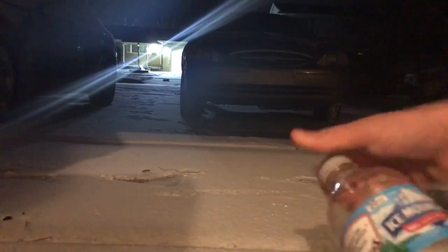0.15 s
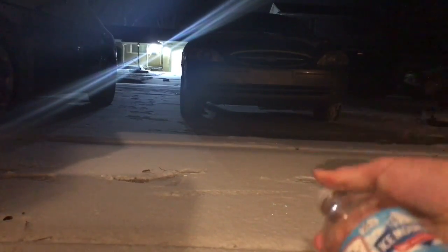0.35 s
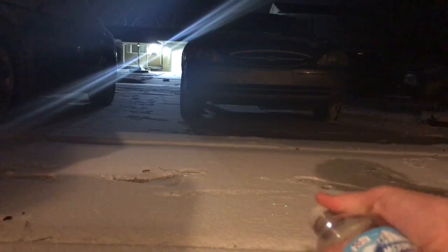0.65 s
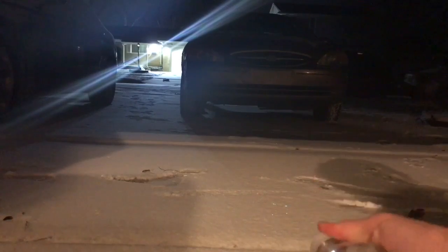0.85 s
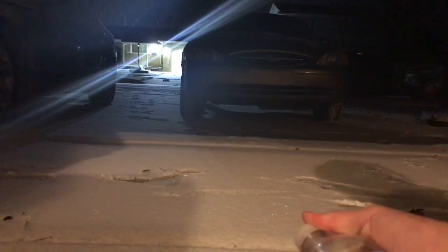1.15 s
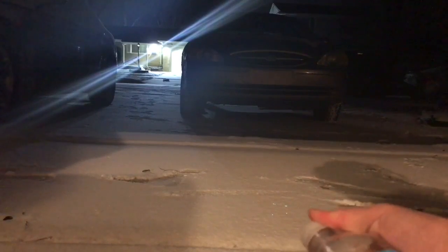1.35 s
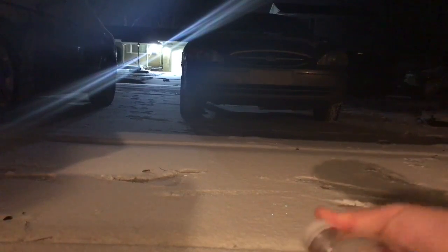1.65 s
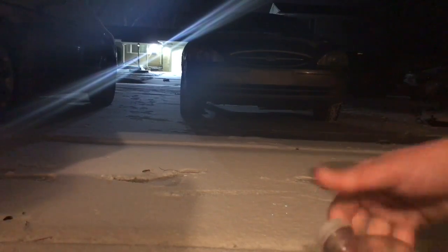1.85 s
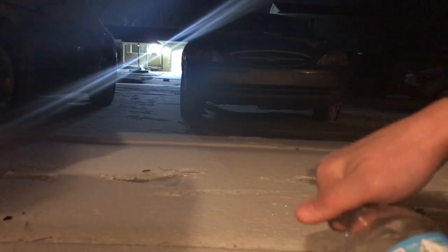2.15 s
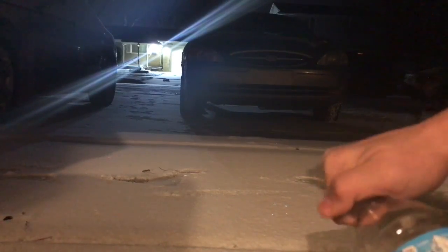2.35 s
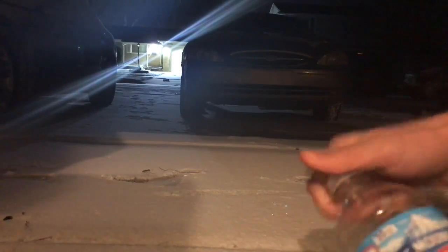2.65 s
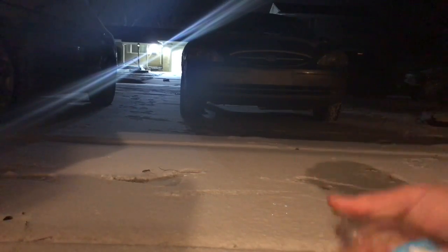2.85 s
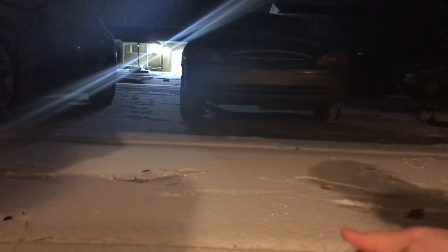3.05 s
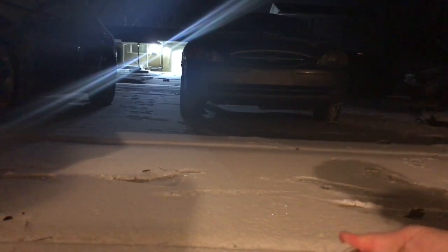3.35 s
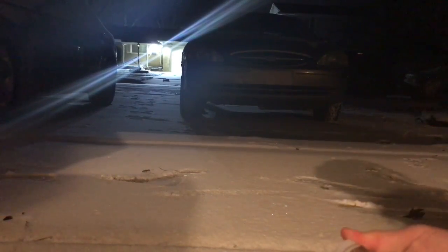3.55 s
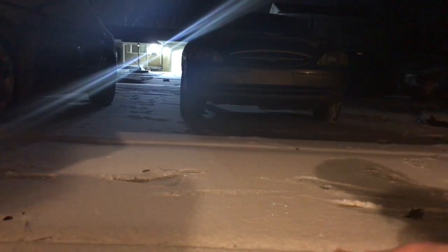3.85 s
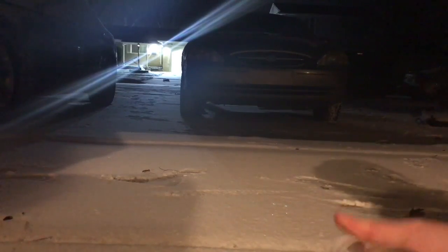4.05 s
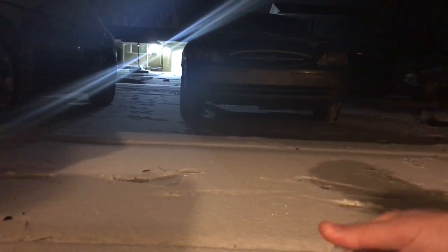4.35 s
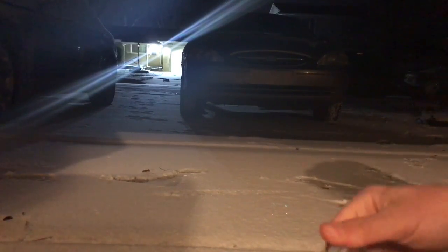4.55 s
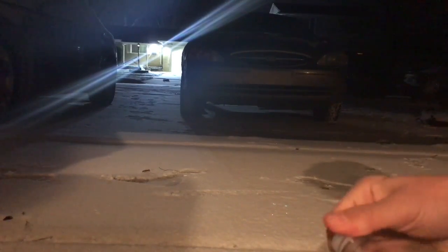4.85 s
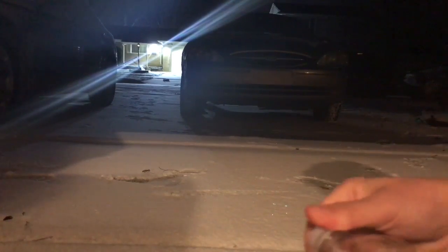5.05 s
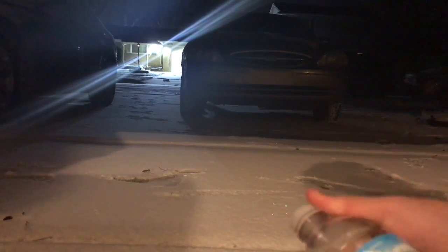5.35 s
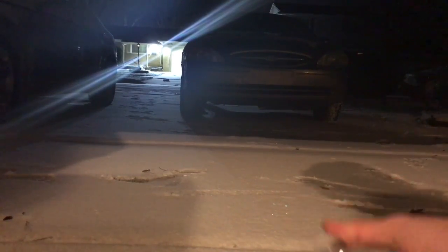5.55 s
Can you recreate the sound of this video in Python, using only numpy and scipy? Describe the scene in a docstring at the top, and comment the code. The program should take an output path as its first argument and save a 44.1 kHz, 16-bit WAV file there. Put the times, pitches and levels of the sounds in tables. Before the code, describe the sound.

Close by, fingers twist the cap of a fizzy plastic bottle, with quick thin snaps and a dull knock. A strong, bright hiss bursts out and fades over more than a second. After faint froth, small rubs and clicks, a weaker hiss swells and stops around a sharp crackling snap. Quiet handling follows. Outdoors over concrete, nearly dry, with a low distant town rumble and slight microphone hiss.

```python
"""Easing the cap of a fizzy drink bottle

A hand twice eases the cap of a pressurised plastic bottle, low over a driveway at night.
Gas jets through the thread as shaped noise: a long hiss and a shorter one, each with a faint edge tone.
The concrete returns a delayed copy. Jerky slips rub the cap and ring the bottle's air, impulses ring the
thin wall and full bottle, tiny bursts make the froth; filtered noise and two tones are a distant town."""
import sys
import numpy as np
from scipy import signal
from scipy.fft import rfft, irfft
from scipy.io import wavfile
from scipy.ndimage import map_coordinates

SR = 44100
rng = np.random.default_rng(int(sys.argv[2]) if len(sys.argv) > 2 else 0)


def int16_out(signal):
    """Quantize to a 16-bit WAV file."""
    q = np.round(np.clip(np.atleast_2d(signal).T, -1, 1) * 32767)
    wavfile.write(sys.argv[1], SR, q.astype(np.int16))


N = 252252
TIME = np.arange(N) / SR
FREQ = np.maximum(np.arange(N // 2 + 1) * SR / N, 1)


def undb(db):
    """Decibels to gain."""
    return 10 ** (np.asarray(db) / 20)


def unit(x):
    """Scale to rms 1."""
    return x / np.sqrt(np.mean(x ** 2) + 1e-20)


def curves(table):
    """Each column of a table, joined by straight lines in time."""
    time_s, *columns = np.transpose(table)
    return [np.interp(TIME, time_s, column) for column in columns]


def colour(x, points):
    """Filter by a (frequency [Hz], level [dB]) spectrum; rms 1."""
    hz, db = np.transpose(points)
    gain = undb(np.interp(np.log(FREQ), np.log(hz), db))
    return unit(irfft(rfft(x) * gain, N))


def resonate(x, hz, width_hz):
    """One resonance with gain 1 at its centre."""
    centre_hz = min(hz, SR / 2 - 1)
    q = hz / min(width_hz, SR / 4)
    b, a = signal.iirpeak(centre_hz, q, fs=SR)
    return signal.lfilter(b, a, x)


def ring(x, modes):
    """Pass a force through a set of modes; neighbours swing in opposite directions."""
    out = 0
    for k, (hz, width_hz, db) in enumerate(modes):
        out = out + (-1) ** k * undb(db) * resonate(x, hz, width_hz)
    return out


def walk(rate_hz):
    """Smooth chance with about `rate_hz` turns a second and spread near 1."""
    knots = rng.standard_normal(N // 8)
    return map_coordinates(knots, [TIME * rate_hz], order=2, mode="wrap")


def grains(rate_hz, spread_db):
    """Tiny impulses of uneven size at random moments; rms 1."""
    hits = rng.random(N) < rate_hz / SR
    sizes = rng.standard_normal(N) * undb(spread_db * rng.standard_normal(N))
    return unit(hits * sizes)


def swell(length_s, edge=0.32):
    """A stroke lasting `length_s` with rounded edges."""
    return signal.windows.tukey(max(int(length_s * SR), 8), min(edge, 1))


def add(out, time_s, x):
    """Mix a short sound in at `time_s`."""
    start = int(time_s * SR)
    x = x[max(-start, 0):max(N - start, 0)]
    first = max(start, 0)
    out[first:first + len(x)] += x


def blow(t60_s, crunch_s, size=6000):
    """A contact force: one push, then a dying crunch that counts for more the longer it lasts."""
    t = np.arange(size) / SR
    tail = rng.standard_normal(size) * np.exp(-np.log(1000) * t / t60_s)
    force = (t60_s / crunch_s) ** 2 * tail / np.linalg.norm(tail)
    force[0] += 1
    return force


# escaping gas, a trickle and two hisses: (time [s], level [dB re LEAK_REFERENCE_DB])
TRICKLE = [(0.0, -37), (0.15, -54.5), (0.196, -52.5), (0.546, -47), (0.68, -54.5)]
LONG_HISS = [(0.7, -46), (0.792, -22), (1.098, -20.5), (1.576, -22.5), (1.778, -32.5), (1.936, -30.5),
             (2.248, -38), (2.424, -54.5), (2.47, -64)]
SHORT_HISS = [(3.2, -83), (3.226, -56), (3.254, -45.5), (3.296, -39.5), (3.682, -28), (3.884, -27.5),
              (4.1, -49.5), (5.078, -71.5), (5.15, -64.5)]
LEAK_REFERENCE_DB = 2.0


def leak():
    """Level of the escaping gas [dB], and how far it lies under its strongest [dB]."""
    relative_db, = curves([*TRICKLE, *LONG_HISS, *SHORT_HISS])
    db = LEAK_REFERENCE_DB + relative_db
    return db, db.max() - db


# spectrum of the jet before its body is reweighted: (frequency [Hz], relative level [dB])
JET_COLOUR = [(200, -38), (480, -34), (660, -25.5), (1500, -24.5), (2000, -18.5), (2750, -18), (3300, -14),
              (4400, -10.5), (4950, -14), (7000, -11), (8500, -6.5), (12500, 1), (14500, 2.5), (17000, 0.5)]
# a slower jet is duller: its body gains this many dB for each dB that the flow falls
BODY_PER_DB = 0.1674
# the gap is pinched late in the long hiss, which thins the body for a moment
PINCH_S, PINCH_WIDTH_S, PINCH_DB = 1.917, 0.16, -7.5


def jet(body_hz=8300, flutter_db=0.5, sputter_db=0.15, spray_db=-9,
        shrill_hz=16950, shrill_width_hz=600, shrill_db=-6):
    """Turbulent gas with a spray of droplets; liquid in the thread makes a weak flow less steady."""
    leak_db, fall_db = leak()
    weak = np.clip(fall_db / 15, 0, 1)

    spray = undb(spray_db) * grains(3000, 3.2)
    gas = colour(rng.standard_normal(N) + spray, JET_COLOUR)
    gas = gas + weak * undb(shrill_db) * resonate(gas, shrill_hz, shrill_width_hz)

    body = irfft(rfft(gas) / (1 + (FREQ / body_hz) ** 12), N)
    pinch_db = PINCH_DB * np.exp(-((TIME - PINCH_S) / PINCH_WIDTH_S) ** 2)
    body_db = BODY_PER_DB * fall_db + pinch_db

    flutter = flutter_db * (1 + weak) * (walk(45) + walk(200))
    unsteady_db = flutter + sputter_db * walk(1600)
    return (gas - body + body * undb(body_db)) * undb(leak_db + unsteady_db)


# puffs and bands of sizzle within and around the hisses:
# (time [s], length [s], level [dB], centre [Hz], width [Hz])
SIZZLES = [(0.073, 0.25, -54, 9230, 1306), (0.768, 0.054, -51.5, 1000, 505), (1.3, 0.57, -38.5, 8040, 1305),
           (2.062, 0.19, -42, 9400, 2200), (3.118, .22, -66, 7900, 1290), (4.003, 0.62, -57.5, 3926, 3980)]


def sizzles():
    """Bands of turbulence swell and fade, each around its own pitch."""
    out = np.zeros(N)
    for time_s, length_s, db, hz, width_hz in SIZZLES:
        shape = swell(length_s, 0.98)
        turbulence = walk(width_hz) + 1j * walk(width_hz)
        band = unit(np.real(turbulence * np.exp(2j * np.pi * hz * TIME)))
        add(out, time_s, undb(db) * shape * band[:len(shape)])
    return out


# edge tones in the thread: (time [s], length [s], fundamental level [dB], top pitch [Hz],
# time to the top [s], pitch flutter [share])
WHISTLES = [(.78, .14, -54, 2200, .13, .04), (3.605, .31, -52.5, 2120, .068, .016)]
SCOOP_HZ, SAG_HZ_PER_S = 177.7, 900


def whistle(overtone_db=1, edge=0.15):
    """An edge tone and its slightly sharp overtone scoop up in pitch, then sag with the pressure."""
    out = np.zeros(N)
    waver, upper_waver = walk(450), walk(700)
    for time_s, length_s, db, top_hz, rise_s, flutter in WHISTLES:
        shape = swell(length_s, edge)
        n = len(shape)
        past_top_s = TIME[:n] - rise_s
        hz = top_hz + np.minimum(SCOOP_HZ * past_top_s / rise_s, -SAG_HZ_PER_S * past_top_s)
        tone_hz = hz * (1 + flutter * waver[:n])
        upper_hz = 2.05 * hz * (1 + flutter * upper_waver[:n] / 2)
        tone = np.sin(2 * np.pi * np.cumsum(tone_hz) / SR)
        upper = np.sin(2 * np.pi * np.cumsum(upper_hz) / SR)
        add(out, time_s, np.sqrt(2) * undb(db) * shape * (tone + undb(overtone_db) * upper))
    return out


# snaps of cap and wall: (time [s], peak [dB], centre of emphasis [Hz], t60 of the crunch [s])
SNAPS = [(.006, -25.5, 4600, 0.018), (0.033, -25, 4530, 0.031), (.049, -38, 667, 0.02),
         (0.0545, -23, 6000, .011), (.413, -34, 7000, 0.042), (0.4408, -29.5, 4370, 0.01),
         (1.831, -29.5, 1350, 0.012), (1.923, -35, 6000, .023), (2.741, -35, 1500, .0086),
         (2.751, -43, 1500, 0.044), (2.936, -37, 6500, .02), (2.946, -31.5, 6450, 0.046),
         (3.005, -38, 3000, 0.032), (3.988, -39, 1010, 0.017), (4.134, -32, 4500, .02),
         (4.1476, -23.5, 2510, 0.014), (4.188, -16.5, 2200, 0.01), (4.193, -33.5, 1960, 0.041),
         (4.197, -26, 7000, 0.021), (4.895, -37.5, 8700, 0.016)]
# ring of the thin wall: (frequency [Hz], width [Hz], relative level [dB])
WALL = [(794, 580, -3), (1396, 510, -1), (2570, 290, 0.5), (3870, 360, -6), (4380, 150, -1),
        (5520, 620, -5.5), (7100, 490, -8), (9130, 1800, -7.5), (13900, 2900, -4)]


def snaps(crunch_s=0.014, focus=0.61):
    """The wall buckles or the cap jumps on its thread, ringing the wall's modes."""
    out = np.zeros(N)
    for time_s, db, hz, t60_s in SNAPS:
        snap = resonate(ring(blow(t60_s, crunch_s), WALL), hz, focus * hz)
        # bending waves disperse: the middle of the band arrives a little late
        snap = snap - 2 * resonate(snap, 3170, 1500)
        add(out, time_s, undb(db) * snap / np.abs(snap).max())
    return out


# dull knocks of the hand on the full bottle: (time [s], peak [dB], softness cut-off [Hz])
KNOCKS = [(.2, -23, 2560), (.2045, -32, 2200), (1.745, -39, 1500), (2.741, -38, 3530), (2.752, -36, 3000),
          (4.19, -37, 300), (4.492, -42.5, 900), (4.543, -40, 513)]
# ring of the full bottle: (frequency [Hz], width [Hz], relative level [dB])
BODY = [(252, 82, -0.5), (415, 97, -4), (556, 87, 2.5), (846, 57, 7), (1030, 31, 10), (1640, 310, -5.5),
        (3100, 1200, -11.5)]


def knocks(t60_s=0.18, crunch=0.4):
    """The soft hand bumps the bottle; the drink slaps after it and the low modes ring briefly."""
    out = np.zeros(N)
    for time_s, db, soft_hz in KNOCKS:
        b, a = signal.butter(2, soft_hz, fs=SR)
        knock = signal.lfilter(b, a, ring(blow(t60_s, t60_s / crunch), BODY))
        add(out, time_s, undb(db) * knock / np.abs(knock).max())
    return out


# rubs of fingers on the cap, and low rings of the bottle's air as the drink swirls:
# (time [s], length [s], level [dB], resonance [Hz])
RUBS_AND_AIR = [(0, 0.091, -47, 3400), (0, 0.06, -52, 5640), (0.181, 0.062, -46.5, 3220),
                (0.345, 0.063, -48.5, 3400), (0.447, 0.067, -47, 3100), (1.949, 0.1, -50.5, 3100),
                (1.93, 0.43, -64, 540), (2.438, 0.17, -62.5, 3970), (2.687, 0.14, -55.5, 3040),
                (2.818, .075, -51.5, 3100), (2.925, 0.028, -45.5, 3360), (2.935, 0.2, -56, 3450),
                (2.996, 0.087, -48.5, 2760), (3.226, 0.32, -54, 3100), (4.356, 0.22, -58.5, 3220),
                (4.46, 0.054, -59, 3050), (4.57, 0.098, -55, 1530), (4.532, .22, -57.5, 537),
                (4.621, .058, -54.5, 2980), (5.001, 0.08, -57, 3200), (5.284, 0.27, -61, 3170),
                (5.6, 0.058, -55, 3220)]


def rubs_and_air(width=0.18, scrape_db=-2, grip_db=1.0, pressure_db=0.8, edge=0.38):
    """Dense tiny jerks ring the cap as skin slips over it, or at low pitch the bottle's air."""
    out = np.zeros(N)
    jerks = grains(5000, 0.49) * undb(grip_db * walk(130) + pressure_db * walk(35))
    scrape = colour(jerks, [(300, -25), (900, -1.0), (1700, 1.5), (2250, 0), (2800, -35),
                            (4500, 3), (7500, -8), (9200, -4.0), (16000, -12)])
    for time_s, length_s, db, hz in RUBS_AND_AIR:
        shape = swell(length_s, edge)
        start = int(time_s * SR)
        part = slice(start, start + len(shape))
        narrow = resonate(jerks[part], hz, width * hz)
        resonance = unit(resonate(narrow, hz, hz))
        # the ribbed cap scratches; the low rings of air hardly do
        ribbed = min(hz / 3000, 1) ** 2
        stroke = unit(resonance + ribbed * undb(scrape_db) * scrape[part])
        add(out, time_s, undb(db) * stroke * shape[:len(stroke)])
    return out


# froth built up by each swirl: (time of the height [s], build-up [s], level [dB])
SWIRLS = [(.45, .5, -57), (.8, 0.094, -56.5), (1.75, 0.73, -62.5), (2.22, 1, -53), (2.51, 0.054, -59),
          (2.77, 0.087, -51), (3.03, 0.13, -58.5), (4.05, 0.13, -55.5), (4.62, 0.26, -52.5),
          (5.35, 0.18, -58.5), (5.6, 0.37, -58)]
FROTH_SETTLE_S = 0.077
# colour of the froth through the wall: (frequency [Hz], relative level [dB])
FROTH_COLOUR = [(150, -52), (330, 3.5), (580, 1), (740, -8), (1000, -2), (1600, -1), (2400, -3),
                (5000, -10), (10000, -19)]


def froth(crackle_db=-13, crackle_rate_hz=40):
    """Small bubbles burst as the drink is swirled; the handled wall crackles faintly with them."""
    power = np.zeros(N)
    for time_s, build_s, db in SWIRLS:
        decay = np.maximum((time_s - TIME) / build_s, (TIME - time_s) / FROTH_SETTLE_S)
        power = power + (undb(db) * np.exp(-decay)) ** 2
    bubbles = colour(grains(3500, 0.82), FROTH_COLOUR) * undb(walk(30))
    crackle = undb(crackle_db) * unit(ring(grains(crackle_rate_hz, 0.55), WALL))
    return (bubbles + crackle) * np.sqrt(power)


# bounce off the concrete as the bottle is lifted and lowered: (time [s], lag [ms])
GROUND = [(0, 1.35), (.8, .95), (1.2, .6), (1.78, .95), (2.2, 1.04), (2.43, 1.19), (3.3, .9), (4.1, .6),
          (4.45, .76), (4.9, 1.15), (5.72, 1)]
# share that bounces with the jet at its strongest, and once it has fallen by BOUNCE_FALL_DB
BOUNCE_STRONG, BOUNCE_WEAK, BOUNCE_FALL_DB = 0.06, 0.33, 17


def ground(x):
    """The concrete's late copy makes a comb that slides with height, clearest when the jet is weak."""
    lag_ms, = curves(GROUND)
    _, fall_db = leak()
    share = np.interp(fall_db, [0, BOUNCE_FALL_DB], [BOUNCE_STRONG, BOUNCE_WEAK])
    late = map_coordinates(x, [(TIME - lag_ms / 1000) * SR], order=3)
    return (x + share * late) / np.sqrt(1 + share ** 2)


def yard(x, wet_db=-21, t60_s=0.12):
    """Parked cars and house walls scatter a faint short tail."""
    t = TIME[:SR // 2]
    tail = rng.standard_normal(len(t)) * np.exp(-np.log(1000) * t / t60_s) * (t > 0.006)
    return x + undb(wet_db) * signal.fftconvolve(x, tail / np.linalg.norm(tail))[:N]


# soft bumps of air and handling: (time [s], length [s], level [dB], frequency [Hz])
BUMPS = [(2.708, 0.082, -51, 89), (4.197, 0.028, -47, 54.4), (4.268, 0.045, -47, 48),
         (5.501, 0.068, -50.5, 49.4)]


def bumps():
    """A few slow cycles of pressure at the microphone."""
    out = np.zeros(N)
    for time_s, length_s, db, hz in BUMPS:
        shape = swell(length_s)
        cycles = np.sin(2 * np.pi * hz * TIME[:len(shape)])
        add(out, time_s, np.sqrt(2) * undb(db) * shape * cycles)
    return out


# spectrum of distant town and microphone hiss: (frequency [Hz], relative level [dB])
TOWN = [(20, -25), (40, -4.5), (65, 3), (125, -2.5), (160, -6.5), (240, -11.5), (400, -22), (1000, -25),
        (2000, -35), (3400, -31), (6000, -36), (10000, -31), (13200, -23), (17000, -32)]
TOWN_DB = -54.5
# hum of far machines: (mean frequency [Hz], level [dB])
HUM = [(76, -65.5), (122, -65.5)]


def town(drift_hz=2.524):
    """A steady far rumble and microphone hiss, with two hums wandering in pitch."""
    out = undb(TOWN_DB) * colour(rng.standard_normal(N), TOWN)
    for hz, db in HUM:
        phase = 2 * np.pi * np.cumsum(hz + drift_hz * walk(9)) / SR
        out = out + undb(db) * unit(np.sin(phase))
    return out


def scene():
    """Bottle and hands close by, the town far off."""
    mirrored = ground(jet() + sizzles() + rubs_and_air() + froth())
    bottle = mirrored + whistle() + snaps() + knocks()
    return (yard(bottle) + bumps() + town())[None]


def record(dry, port_hz=10550, port_width_hz=1600, port_depth=0.65, top_hz=17300):
    """The microphone port dips the treble; the recorder cuts the top."""
    coloured = dry - port_depth * resonate(dry, port_hz, port_width_hz)
    low_pass = signal.ellip(12, 0.1, 80, top_hz, fs=SR, output="sos")
    return signal.sosfilt(low_pass, coloured)


dry = scene()
out = record(dry)
int16_out(out)
```